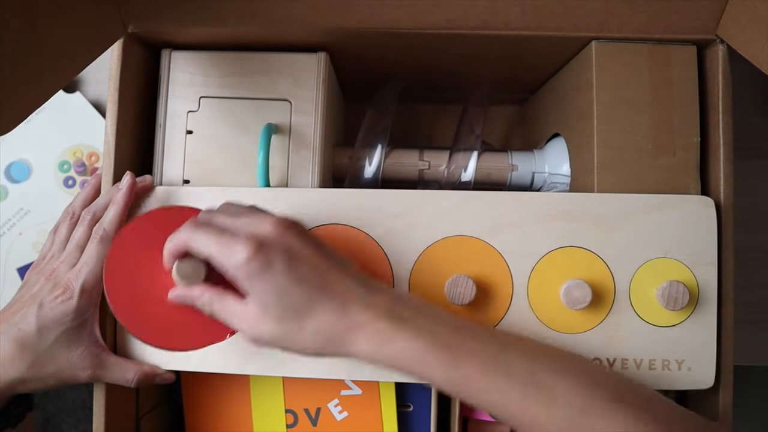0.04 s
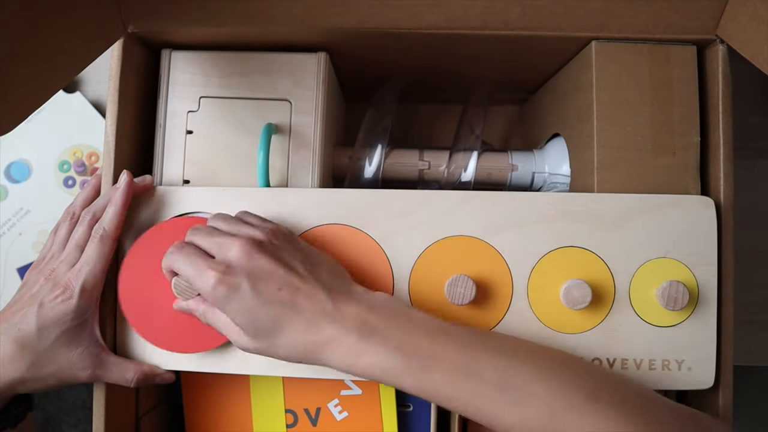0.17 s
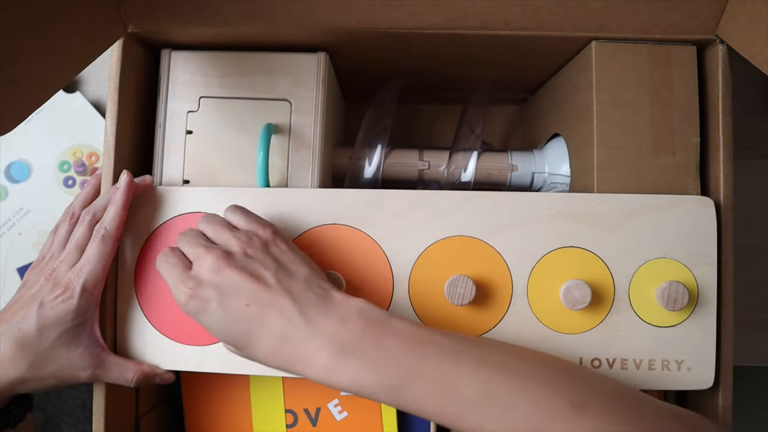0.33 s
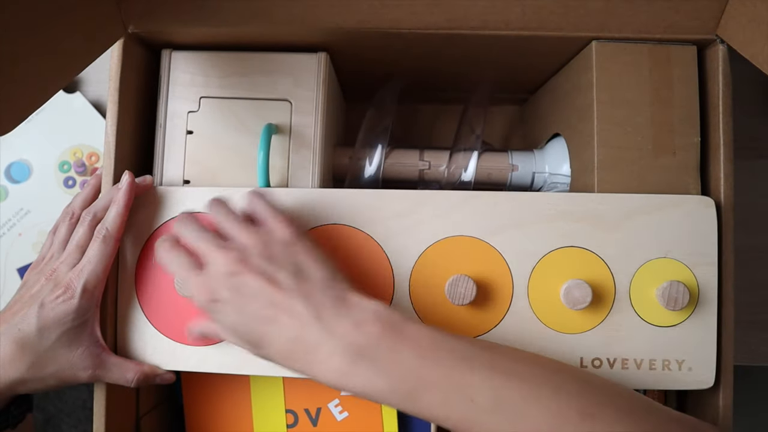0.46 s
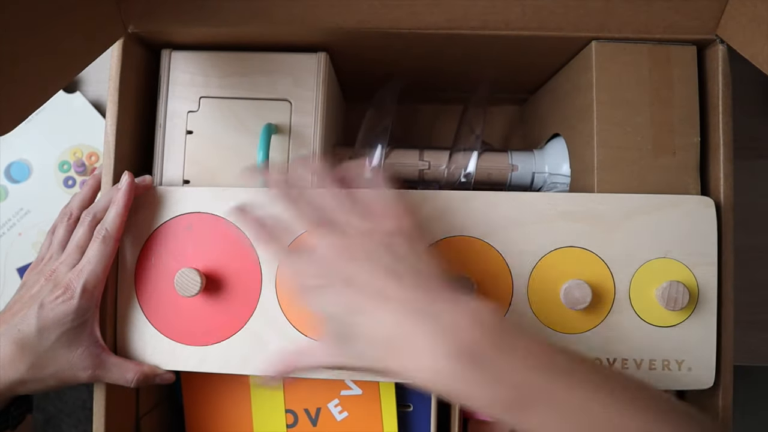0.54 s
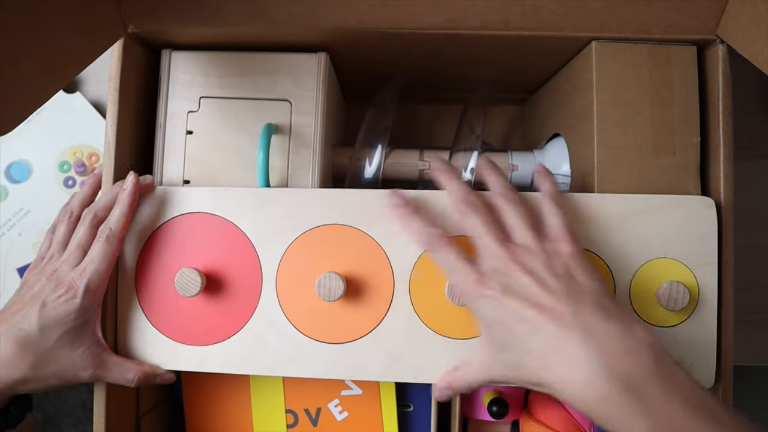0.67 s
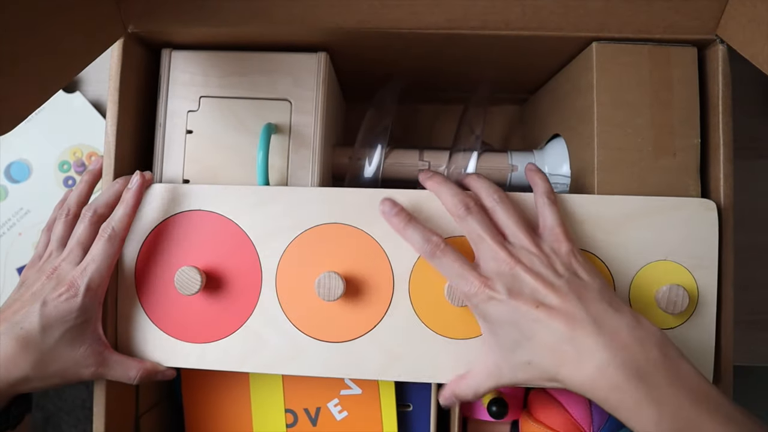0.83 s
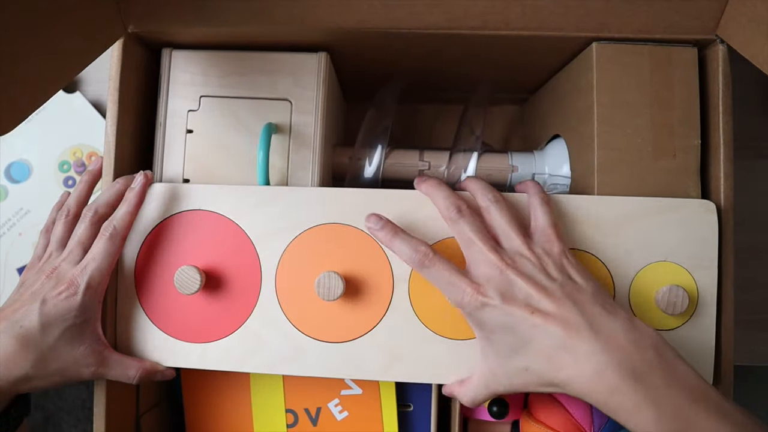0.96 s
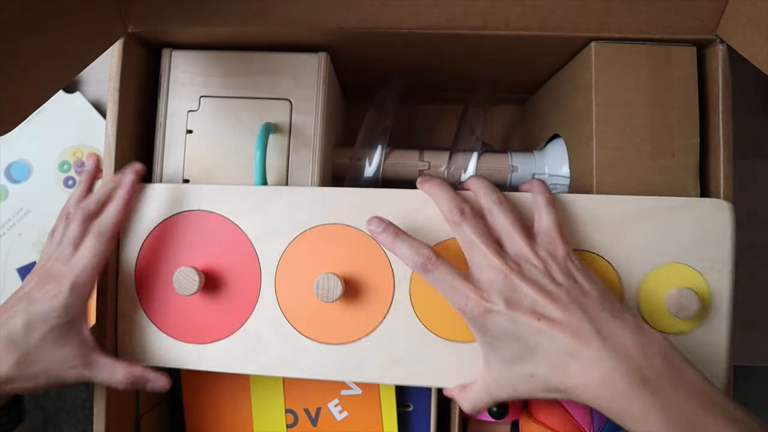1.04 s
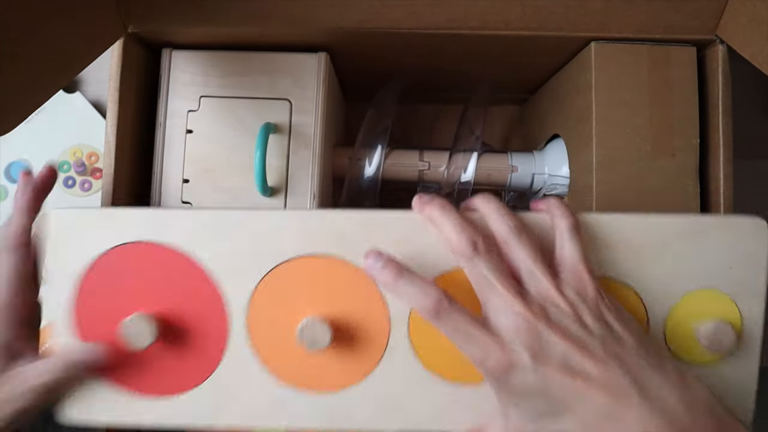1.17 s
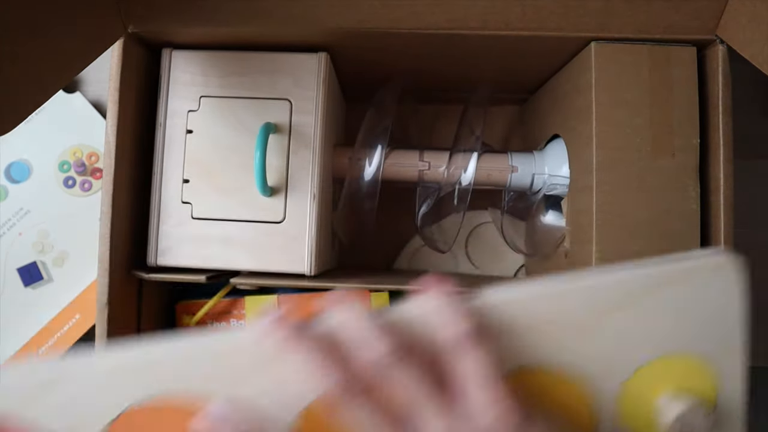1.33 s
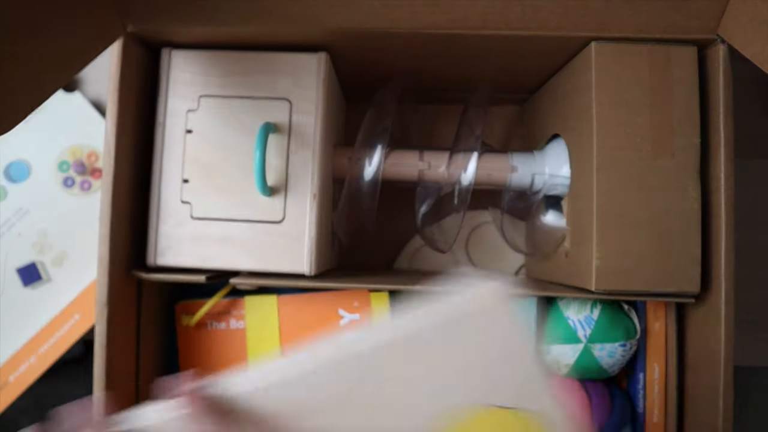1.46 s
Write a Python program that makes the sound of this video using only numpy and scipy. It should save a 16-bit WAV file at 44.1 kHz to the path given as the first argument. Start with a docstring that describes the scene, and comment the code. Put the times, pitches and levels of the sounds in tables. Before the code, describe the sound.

A round wooden puzzle piece clacks into its board with a quick rattle and a faint ring. Hands then pat, grip and lift the board, making dull thuds on a cardboard box and light rustles, close by in a quiet room.

```python
"""Over a quiet room's hush and a low handling rumble, fingers bump a plywood board on a cardboard box.
A round wooden puzzle piece hits its recess on one edge, rattles and drops flat, ringing the wood's
modes while the box thuds underneath. A thin ring lingers and sinks. Then hands pat, grip and lift
the board: skin and card rustle, nails tick. The small room answers the piece and the hands."""
import sys
import numpy as np
from scipy import signal
from scipy.fft import rfft, irfft
from scipy.io import wavfile

SR = 44100
rng = np.random.default_rng(int(sys.argv[2]) if len(sys.argv) > 2 else 0)


def file_out(sig):
    """Save sig as 16-bit WAV at sys.argv[1]."""
    # one column per channel
    cols = np.atleast_2d(sig).T
    # limit, then scale
    lim = np.clip(cols, -1, 1)
    pcm = np.round(lim * 32767).astype(np.int16)
    wavfile.write(sys.argv[1], SR, pcm)


N = 66150
TIME = np.arange(N) / SR


def amp(db):
    """Decibels to gain."""
    return 10 ** (np.asarray(db) / 20)


def unit(x):
    """Scales to rms 1."""
    return x / np.sqrt(np.mean(x ** 2) + 1e-20)


def unit_blow(x, length_s=0.005):
    """Scales a knock to the energy of rms 1 lasting length_s."""
    return x / np.linalg.norm(x) * np.sqrt(length_s * SR)


def curve_at(points, hz):
    """Interpolates (Hz, value) rows on a log-frequency axis."""
    points_hz, values = np.transpose(points)
    return np.interp(np.log(hz + 1), np.log(points_hz + 1), values)


def add(mix, start_s, sound):
    """Mixes a sound in at start_s."""
    part = mix[round(start_s * SR):][:len(sound)]
    part += sound[:len(part)]


def noise(spectrum):
    """Noise of rms 1, coloured by (Hz, dB) rows."""
    hz = np.fft.rfftfreq(N, 1 / SR)
    return unit(irfft(rfft(rng.standard_normal(N)) * amp(curve_at(spectrum, hz)), N))


def lowpass(x, hz):
    """Second-order low-pass."""
    return signal.sosfilt(signal.butter(2, hz, fs=SR, output="sos"), x)


def noise_floor(hush_db=-73.5, hiss_db=-67.5):
    """Steady room hush and microphone hiss."""
    # Spectra. Each row: frequency in Hz, relative level in dB.
    hush = [(150, -1.5), (280, 1.5), (550, -4), (850, 1), (1300, -10.5), (3000, -25), (8000, -37)]
    hiss = [(30, 14), (200, -5.5), (500, 13), (1000, 4), (2000, 6), (4000, 6), (9000, 4), (15500, 7.5)]
    return amp(hush_db) * noise(hush) + amp(hiss_db) * noise(hiss)


def rumble():
    """Low shuffling of board and box under the hands."""
    # Handling envelope. Each row: time in seconds, level in dB.
    handling = [(0, -47.5), (.16, -40), (.22, -52.5), (.33, -34.5), (.49, -41), (.6, -44), (.72, -42.5),
                (.8, -26), (.89, -37.5), (1.0, -27.5), (1.14, -34), (1.3, -42.5), (1.44, -44), (1.5, -36.5)]
    # Each row: frequency in Hz, relative level in dB.
    spectrum = [(15, 9.5), (30, -2), (50, 4), (85, 0), (125, -2.5), (175, -18.5), (260, -30), (500, -34.5),
                (750, -41), (1100, -43.5), (2500, -51.5), (8000, -72)]
    return noise(spectrum) * amp(np.interp(TIME, *np.transpose(handling)))


def taps(gain_db=4, rise_s=0.0023):
    """Fingers bump the board: dull, padded, no clear ring."""
    # Each row: start in seconds, relative level in dB, cut-off in Hz, t60 in seconds.
    bumps = [(.203, -48.5, 350, 0.064), (.263, -36, 390, 0.073), (.308, -34.5, 450, 0.055),
             (.388, -44, 352, 0.046), (.480, -53, 1997, 0.021), (0.492, -52.5, 1757, 0.1),
             (0.76, -39.5, 1350, 0.04), (0.908, -45.5, 760, 0.053), (0.933, -42, 1450, 0.056),
             (1.012, -48.5, 990, 0.05), (1.047, -42, 2500, 0.11), (1.053, -48, 1540, 0.1),
             (1.102, -46, 914, 0.047), (1.2130, -45, 676, 0.033), (1.271, -53, 1000, 0.027),
             (1.419, -49, 870, 0.031), (1.494, -51, 2030, 0.071)]
    # Each row: frequency in Hz, relative level in dB.
    spectrum = [(60, 4.5), (170, 6.5), (280, -4.5), (500, 5), (780, -9), (1050, -4), (2000, -10.5),
                (4000, -15.5), (15000, -26)]
    out = np.zeros(N)
    rise = np.minimum(TIME / rise_s, 1)
    for start_s, db, cut_hz, t60_s in bumps:
        bump = unit(lowpass(noise(spectrum), cut_hz))
        add(out, start_s, bump * rise * amp(db + gain_db - 60 * TIME / t60_s))
    return out


def clacks(grain_db=-5, grain_t60_s=0.029, grain_rise_s=0.00033, detune=0.0081):
    """Each contact of piece and board starts all their modes, plus a dense, fast-dying cluster."""
    # Each row: start in seconds, level in dB, low and high edge in Hz, cluster offset in dB,
    # ring length factor, flatness (0 = rim, 1 = face).
    contacts = [(0.2298, -43, 400, 2980, 6.5, 1, 0.062), (0.2321, -21.5, 262, 4470, 0, 1.1, 0),
                (0.2372, -27, 120, 2580, -1.5, 1.1, 0), (.2505, -41, 1500, 4000, 3, 1, .3),
                (.2517, -30, 248, 1300, 2.5, 0.71, 0.15), (0.2533, -31.5, 120, 933, 2, 0.48, 0.16),
                (.2648, -37, 122, 790, 4, .5, .3), (.2812, -34.5, 815, 2430, -10, 0.91, 0.28),
                (0.2836, -20, 1130, 1820, 2, 0.88, 0.98), (0.2862, -29.5, 2564, 3480, -4, 0.92, 0.78),
                (0.303, -39.5, 1740, 3960, 0, .8, 1), (0.3144, -36.5, 900, 2480, -2, 0.54, 0.32),
                (0.371, -41, 246, 1300, -11, 0.38, 0), (1.38, -59, 900, 1490, 1, 0.46, 1),
                (1.423, -56, 394, 1290, -7, .5, 1)]
    # Each row: frequency in Hz, rim-struck and face-struck relative level in dB, base t60 in seconds.
    modes = [(445, -23.5, -9, 0.11), (595, -17.5, -17.5, 0.19), (980, -18, -31, 0.036),
             (1254, -24.5, -12, 0.075), (1468, -3, -4, .028), (1543, -8.5, -12, 0.035),
             (1719, -31, -15.5, 0.1), (1980, -12.5, -21.5, 0.027), (2510, -12.5, -23.5, 0.037),
             (2746, -18.5, -10, 0.027), (3294, -31, -16, 0.051), (3470, -28, -10.5, 0.027),
             (3917, -19, -34, 0.039), (8400, -22.5, -32, 0.044)]
    # The plywood's crowded modes. Each row: frequency in Hz, relative level in dB.
    grain = [(100, -5), (350, -3.5), (750, -9.5), (1400, 3), (2200, -8), (3500, -2.5), (5000, -23),
             (6500, -17.5), (8500, -25.5), (15000, -19)]
    out = np.zeros(N)
    t = TIME[:SR // 4]
    rise = np.minimum(t / grain_rise_s, 1)
    for start_s, db, low_hz, high_hz, cluster_db, ring_factor, flatness in contacts:
        ring = np.zeros(len(t))
        for hz, rim_db, face_db, t60_s in modes:
            mode_db = np.interp(flatness, [0, 1], [rim_db, face_db])
            detuned_hz = hz * (1 + detune * rng.standard_normal())
            ring += amp(mode_db - 60 * t / (t60_s * ring_factor)) * np.sin(2 * np.pi * detuned_hz * t)
        cluster = noise(grain)[:len(t)] * rise * amp(grain_db + cluster_db - 60 * t / grain_t60_s)
        low_cut = signal.butter(2, low_hz, "highpass", fs=SR, output="sos")
        knock = lowpass(signal.sosfilt(low_cut, ring + cluster), high_hz)  # softer contact, less treble
        add(out, start_s, amp(db) * unit_blow(knock))
    return out


def thuds(rise_s=0.0049):
    """The box gives under the board's weight and swings for a few low cycles."""
    # Each row: start in seconds, level in dB, pitch in Hz, t60 in seconds.
    landings = [(.238, -33.5, 142.4, 0.2), (.288, -23.5, 110, 0.22), (0.306, -23.5, 46.63, 0.98),
                (0.352, -24, 49.9, 0.23), (.772, -18, 119.5, 0.2), (.764, -16, 51.3, 0.16),
                (.836, -12, 55.4, 0.081), (.830, -29, 126, 0.22), (.938, -14, 45.6, 0.18),
                (.976, -15, 44.4, 0.23), (1.021, -24, 32.8, 0.32), (1.087, -26.5, 82.7, 0.23),
                (1.215, -26, 162, 0.049)]
    out = np.zeros(N)
    rise = 1 - np.exp(-(TIME / rise_s) ** 2)
    for start_s, db, hz, t60_s in landings:
        add(out, start_s, rise * amp(db - 60 * TIME / t60_s) * np.sin(2 * np.pi * hz * TIME))
    return out


def sinking_ring(waver_hz=30, waver_depth=0.9):
    """A thin, wavering ring sinks and fades once the piece is seated."""
    # Each row: time in seconds, pitch in Hz, level in dB.
    glide = [(.305, 1810, -72), (0.314, 1790, -42), (.332, 1800, -55), (.395, 1729, -59.5),
             (0.439, 1655, -69.5), (.52, 1535, -72.5), (.55, 1520, -88.5)]
    times_s, hz, db = np.transpose(glide)
    carrier = np.exp(2j * np.pi * np.cumsum(np.interp(TIME, times_s, hz)) / SR)
    waver_re, waver_im = (unit(lowpass(white, waver_hz)) for white in rng.standard_normal((2, N)))
    tone = (carrier * (1 + waver_depth * (waver_re + 1j * waver_im))).real
    gate = (TIME > times_s[0]) & (TIME < times_s[-1])
    return unit(tone) * amp(np.interp(TIME, times_s, db)) * gate


def rubs(roughness_db=1.5, roughness_hz=230):
    """Hands and board slide with grainy friction: skin hisses, card scuffs hollowly."""
    # Each row: start in seconds, length in seconds, skin level in dB, card level in dB.
    strokes = [(0.364, 0.023, -63.5, -40), (0.43, 0.047, -76, -56), (0.479, .06, -67.5, -68.5),
               (0.715, 0.091, -62.5, -53), (0.793, 0.16, -63.5, -60), (0.92, 0.046, -57.5, -48),
               (.965, 0.087, -67, -58), (1.038, 0.019, -59, -47.5), (1.053, 0.029, -61.5, -74),
               (1.073, 0.049, -67, -56), (1.298, 0.19, -60.5, -72), (1.355, 0.038, -65, -74),
               (1.469, 0.029, -60.5, -56)]
    # Each row: frequency in Hz, relative level in dB.
    skin_spectrum = [(200, -7), (800, -23), (1300, -4), (2200, -5.5), (3600, 5), (5200, -2.5), (7500, -5),
                     (10000, -10.5), (15000, -24)]
    card_spectrum = [(100, 4), (250, 2), (450, -6), (600, -8.5), (800, -10.5), (1100, -10), (2000, -22.5),
                     (6000, -47)]
    skin_gain, card_gain = np.zeros((2, N))
    for start_s, length_s, skin_db, card_db in strokes:
        swell = np.sin(np.pi * np.clip((TIME - start_s) / length_s, 0, 1))
        skin_gain += amp(skin_db) * swell
        card_gain += amp(card_db) * swell
    roughness = unit(lowpass(rng.standard_normal(N), roughness_hz))
    catches = unit(amp(roughness_db * roughness))
    return catches * (skin_gain * noise(skin_spectrum) + card_gain * noise(card_spectrum))


def nails(t60_s=0.033):
    """Fingernails tick brightly on the wood as the fingers close."""
    # Each row: start in seconds, level in dB.
    ticks = [(1.0480, -52), (1.07, -58.5), (1.0770, -71)]
    # Each row: frequency in Hz, relative level in dB.
    spectrum = [(1000, -27), (5000, -18), (6500, -2), (8500, -9), (10000, -20), (15000, -36)]
    out = np.zeros(N)
    for start_s, db in ticks:
        add(out, start_s, noise(spectrum) * amp(db - 60 * TIME / t60_s))
    return out


def room(x, delay_s=0.0068):
    """Short diffuse tail, each band dying at its own rate."""
    # Each row: frequency in Hz, t60 in seconds.
    decay = [(100, 0.55), (400, 0.45), (900, 0.31), (1700, .28), (3500, .32), (9000, 0.25)]
    # Each row: frequency in Hz, relative level in dB.
    colour = [(100, 4), (500, 2), (900, -1), (1500, -5.5), (3300, -2.5), (9000, 0)]
    hz, t, bands = signal.stft(rng.standard_normal(N), SR, nperseg=256)
    bands *= amp(curve_at(colour, hz)[:, None] - 60 * t / curve_at(decay, hz)[:, None])
    tail = signal.istft(bands, SR, nperseg=256)[1][:N] * (TIME > delay_s)
    return signal.fftconvolve(x, tail / np.linalg.norm(tail))[:N]


def scene(piece_send_db=-10, hand_send_db=-12):
    """Piece and hands feed the room; ring, thuds, rumble and noise floor stay dry. Mono."""
    piece = clacks()
    hands = taps() + rubs() + nails()
    echo = room(amp(piece_send_db) * piece + amp(hand_send_db) * hands)
    return (piece + hands + echo + sinking_ring() + thuds() + rumble() + noise_floor())[None]


def record(dry, edge_hz=15950):
    """The microphone's band limit."""
    kernel = signal.firwin(511, edge_hz, window=("kaiser", 9), fs=SR)
    return signal.oaconvolve(dry, kernel[None], "same")


dry = scene()
out = record(dry)
file_out(out)
```